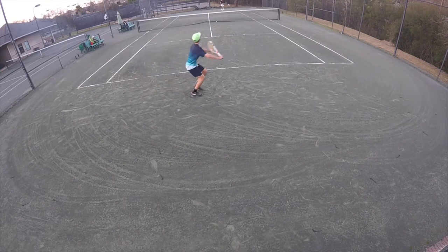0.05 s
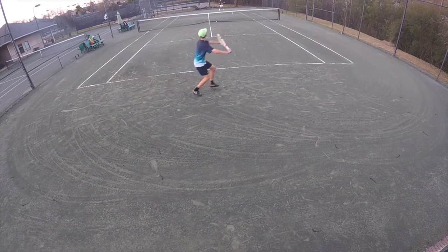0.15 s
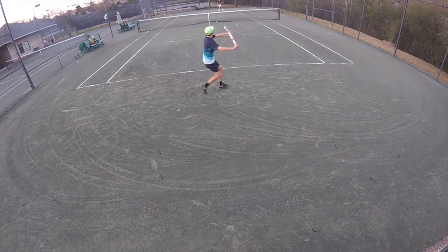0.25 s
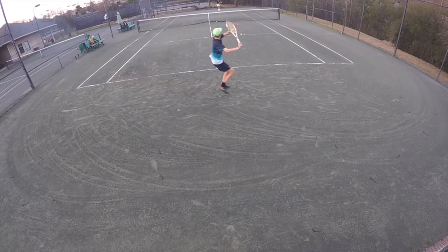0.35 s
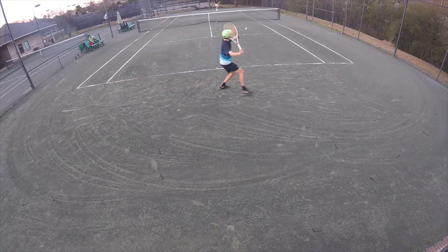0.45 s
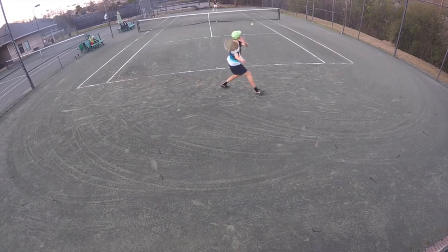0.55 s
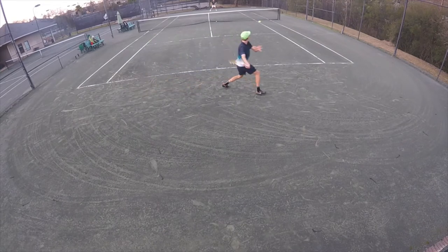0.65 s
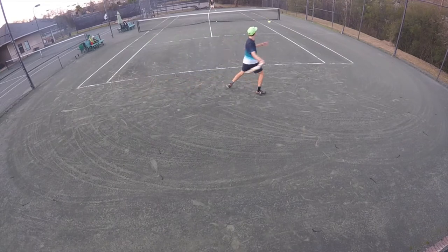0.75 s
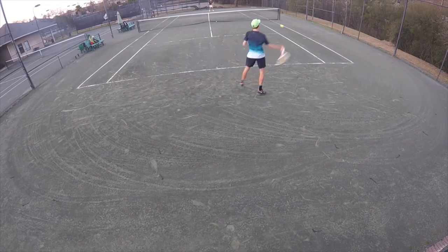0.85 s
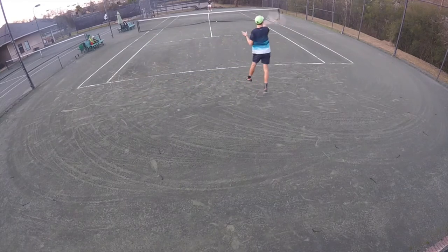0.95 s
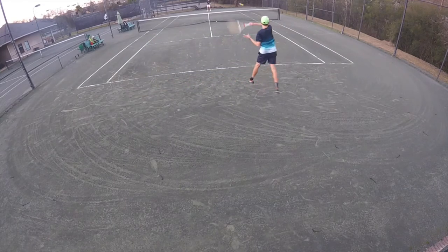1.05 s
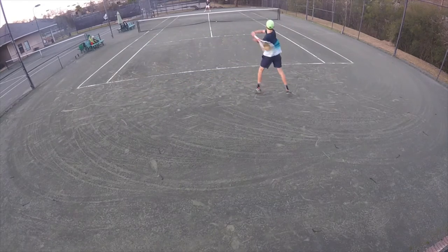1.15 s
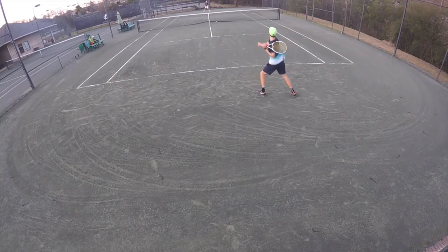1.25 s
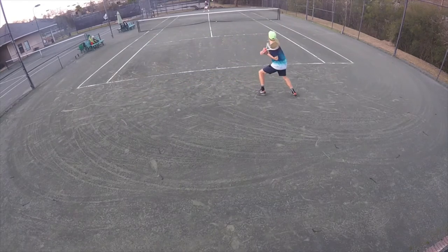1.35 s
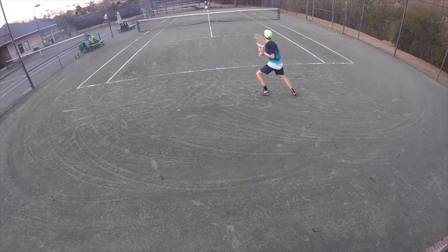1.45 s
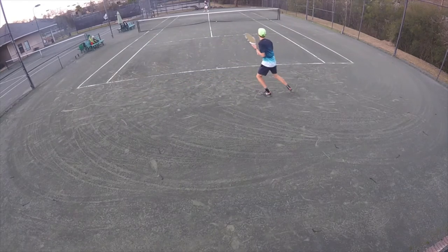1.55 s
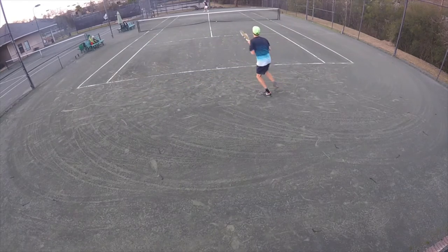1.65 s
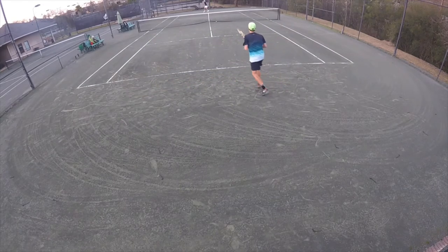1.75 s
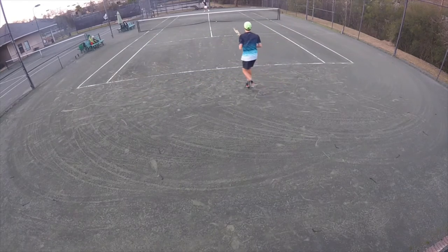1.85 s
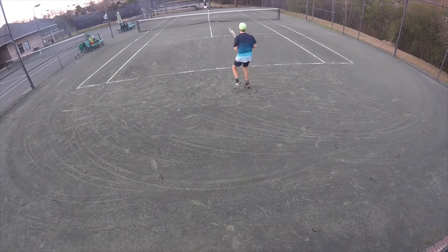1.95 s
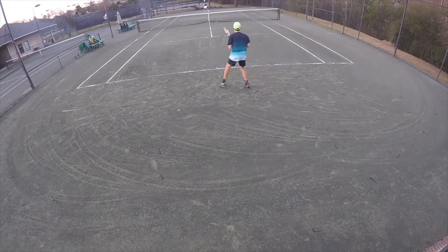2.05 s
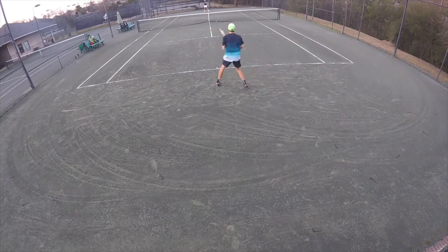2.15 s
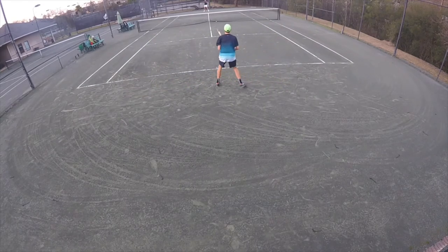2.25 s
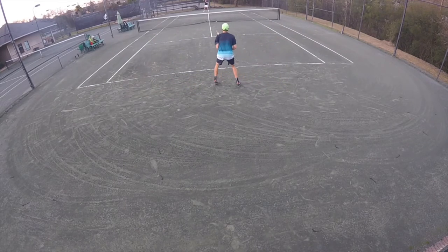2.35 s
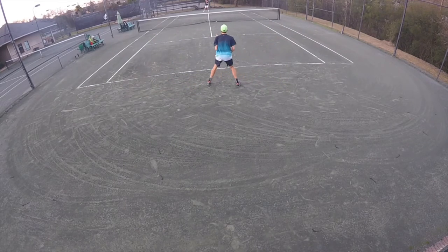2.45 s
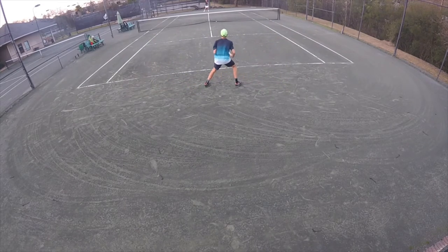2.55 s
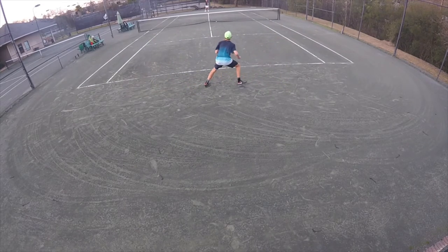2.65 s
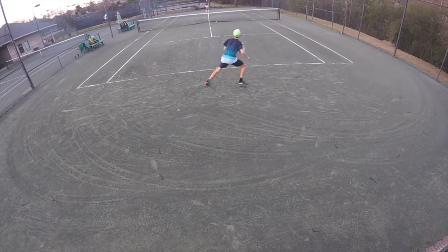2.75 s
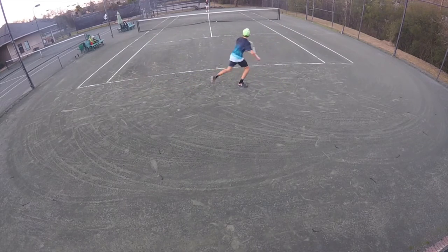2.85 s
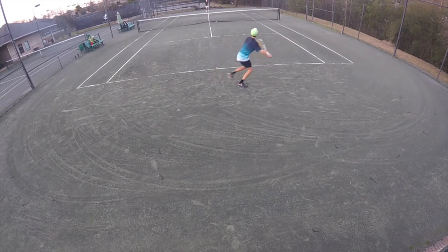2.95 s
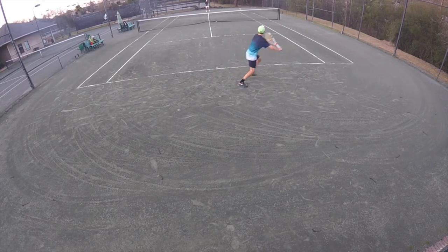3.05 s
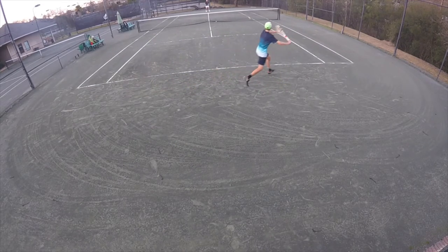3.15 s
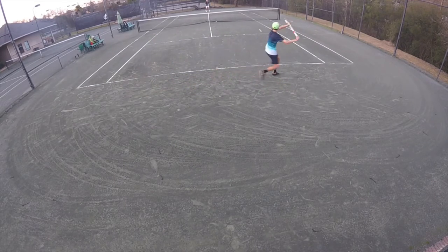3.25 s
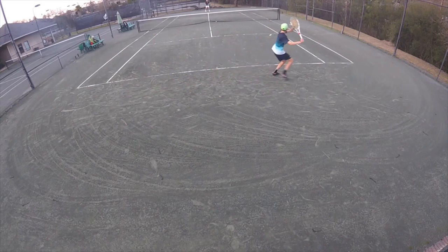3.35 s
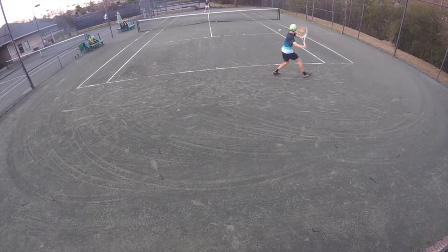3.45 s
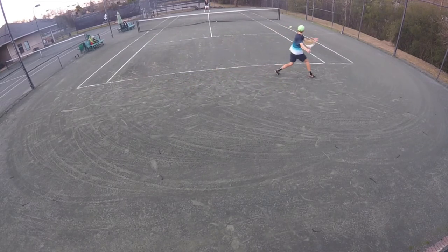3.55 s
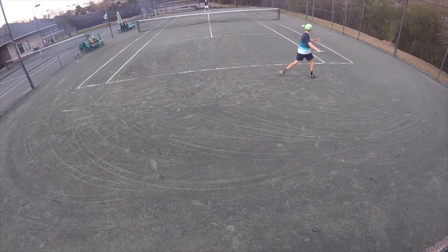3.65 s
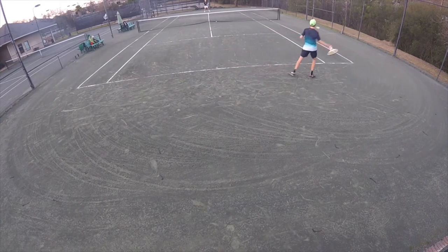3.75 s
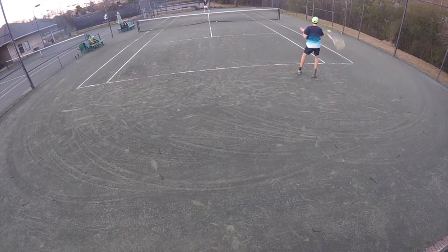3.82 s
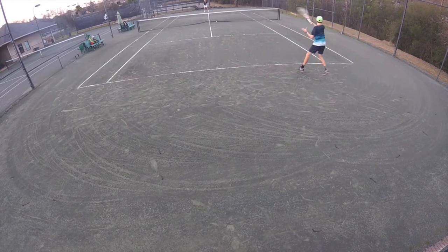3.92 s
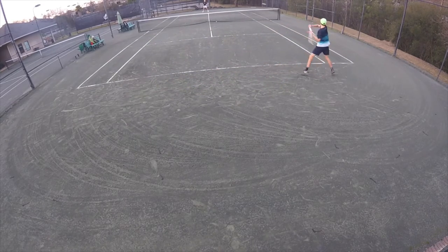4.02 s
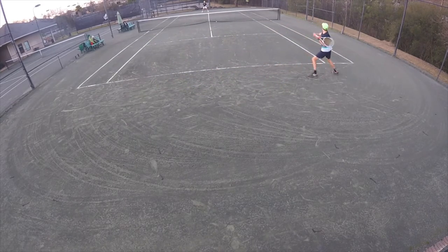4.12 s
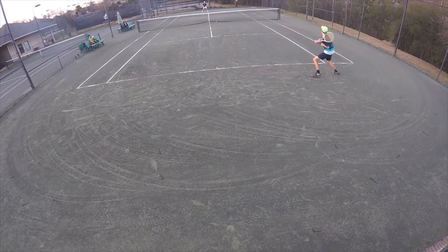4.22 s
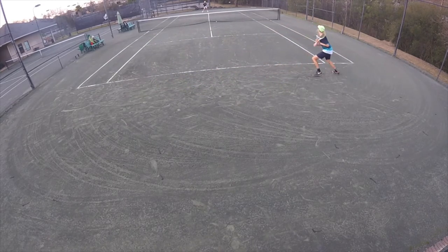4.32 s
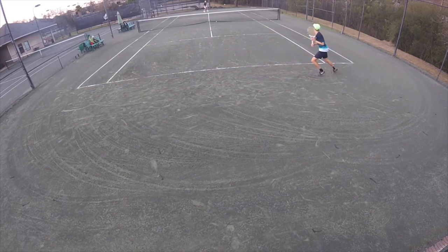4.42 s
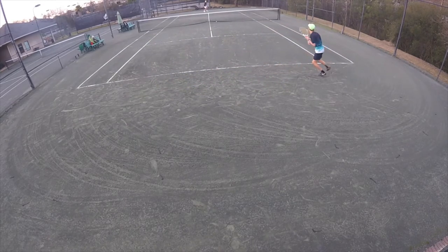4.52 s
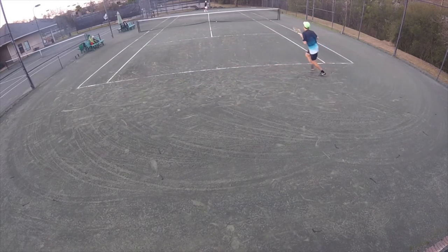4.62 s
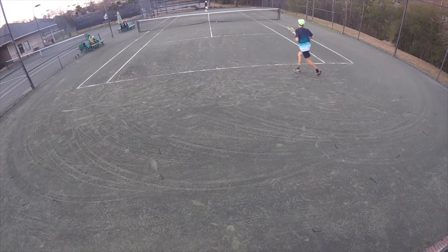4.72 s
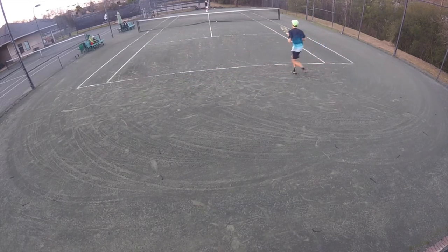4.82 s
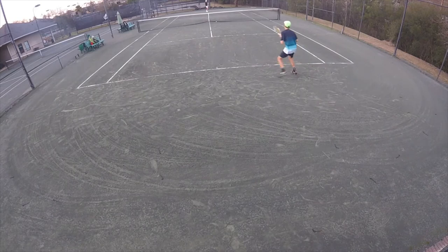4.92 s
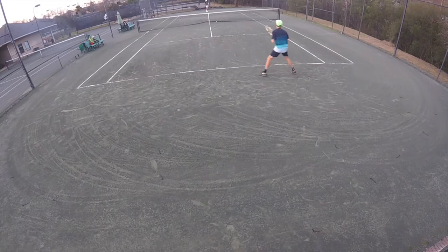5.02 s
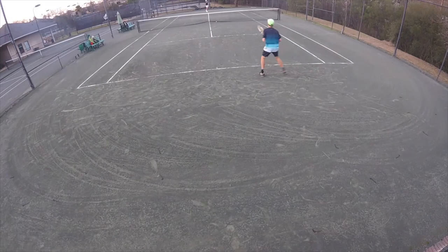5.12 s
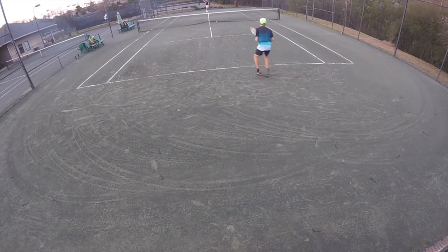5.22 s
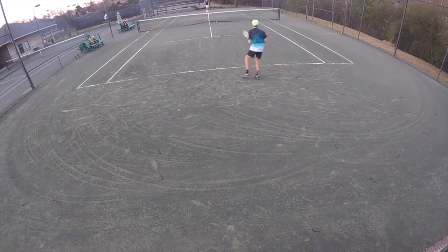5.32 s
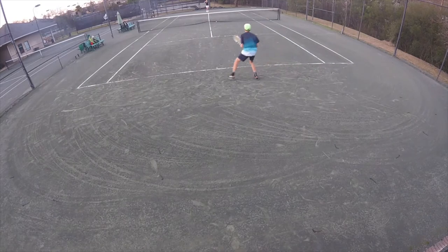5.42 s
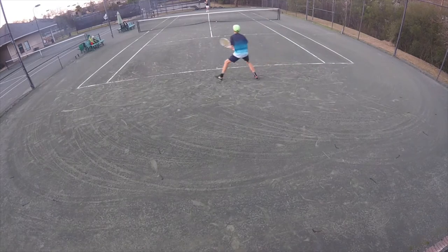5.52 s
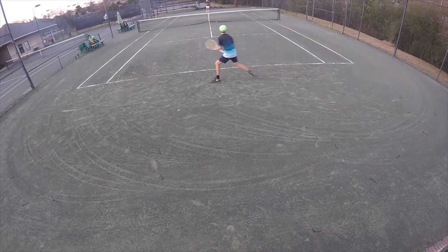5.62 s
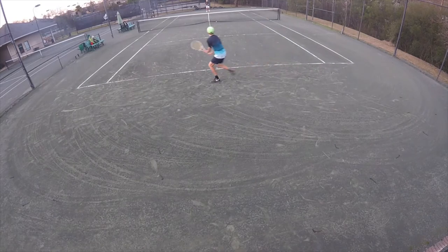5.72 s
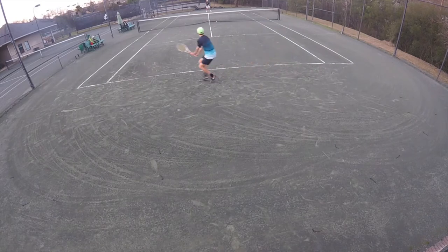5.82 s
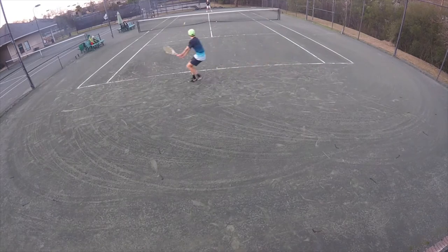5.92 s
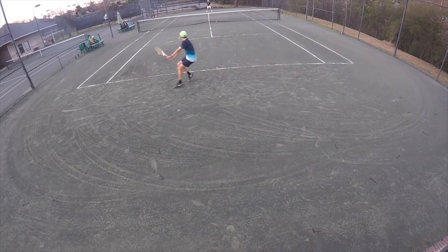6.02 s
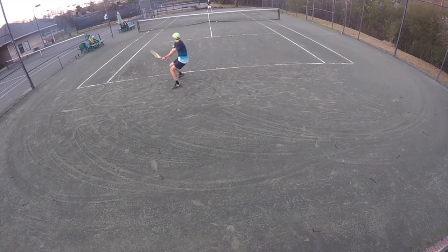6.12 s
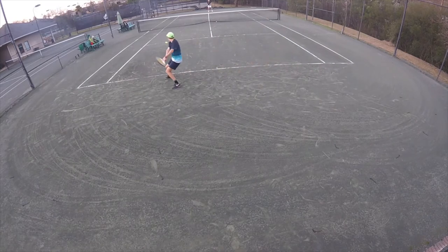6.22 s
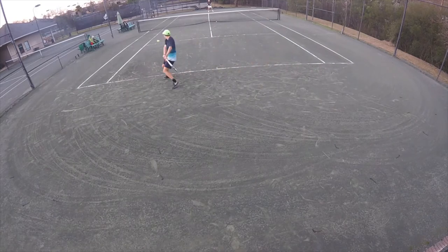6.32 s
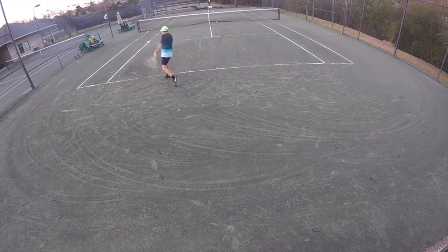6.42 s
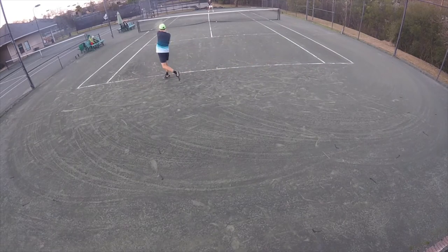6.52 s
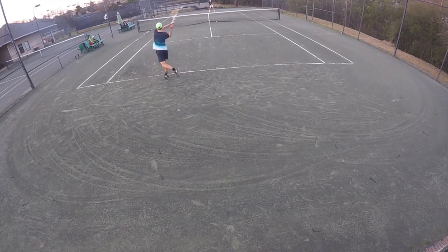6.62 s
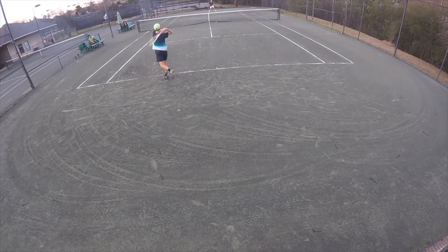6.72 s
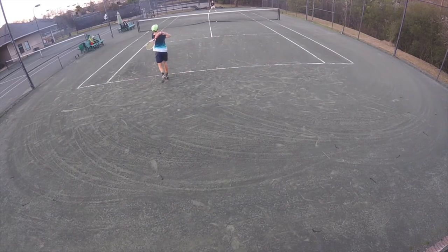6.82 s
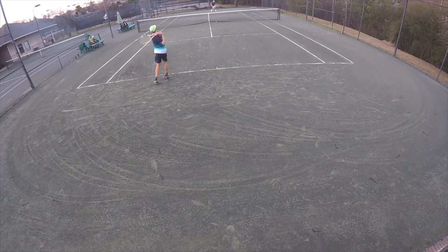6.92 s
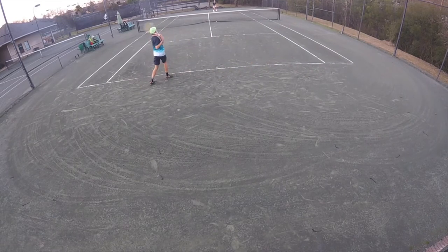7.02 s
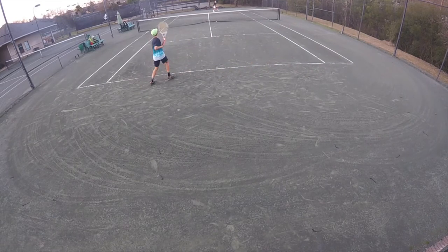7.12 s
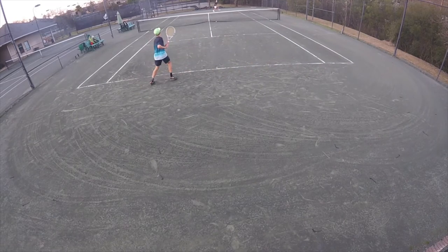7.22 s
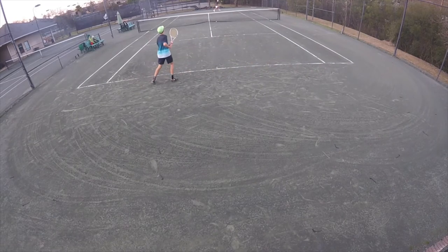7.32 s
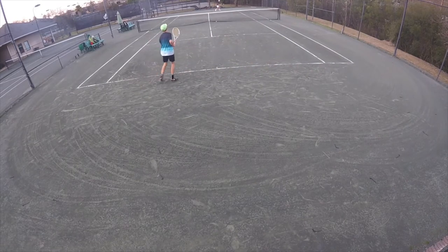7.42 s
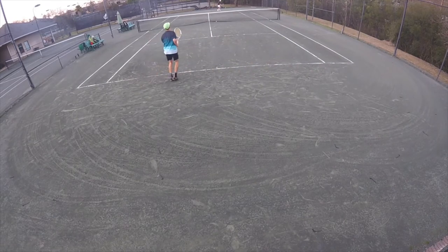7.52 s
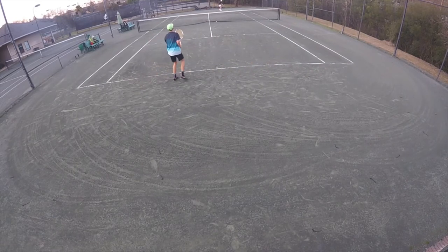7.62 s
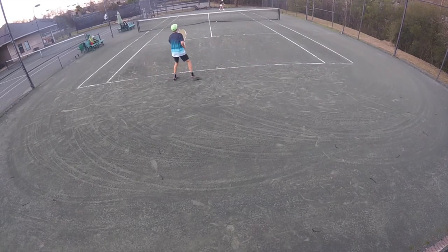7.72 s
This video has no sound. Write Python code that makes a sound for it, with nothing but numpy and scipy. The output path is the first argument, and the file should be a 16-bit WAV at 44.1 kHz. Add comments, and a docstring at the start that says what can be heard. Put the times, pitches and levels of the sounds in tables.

```python
"""Racket strokes of a tennis rally on an outdoor clay court, heard from behind the near player.
Each stroke is a thump, a short ring of strings and ball and a noisy crack, doubled by a ground echo
and answered by a thin tail from the surroundings. The ball thuds and rings as it bounces, shoes land
with a thud and slap, random grains make the crunch of sliding soles and one faint hiss, stones click.
Filtered noise makes the wind rumble and the distant traffic hum; a faint tone whistles once, far away."""
import sys
import numpy as np
from scipy import signal
from scipy.fft import rfft, irfft, next_fast_len
from scipy.io import wavfile
from scipy.ndimage import map_coordinates

SR = 44100
rng = np.random.default_rng(int(sys.argv[2]) if len(sys.argv) > 2 else 0)


def master(y):
    """Save y as 16-bit WAV."""
    cut = np.clip(np.atleast_2d(y).T, -1, 1)
    pcm = np.round(cut * 32767)  # scale
    wavfile.write(sys.argv[1], SR, pcm.astype(np.int16))


N = 342657
T = np.arange(N) / SR  # time in seconds
BLOW = T[:SR // 8] - 0.005  # time within one blow, from just before the contact at 0

# Tone colour of felt slapping strings. Each row: frequency in Hz, relative level in dB per Hz.
CRACK_COLOUR = [(600, 9.5), (1450, 11), (2000, -2.5), (2700, 2), (3800, 1.5), (4400, -9.5), (5200, -6.5),
                (7500, -10), (10000, -11.5), (12000, -15.5), (15000, -14)]
# Dull colour of a shoe or ball slapping the clay. Each row: frequency in Hz, relative level in dB per Hz.
SLAP_COLOUR = [(100, -40), (350, 7.5), (1200, 8), (1800, -34), (4000, -27), (12000, -51)]
# Bright colour of grit and small stones. Each row: frequency in Hz, relative level in dB per Hz.
GRIT_COLOUR = [(1200, -32), (2000, -4), (2450, -2.5), (3100, -3), (3900, -8.5), (4350, -5.5), (5000, -7),
               (7000, -9), (8500, -12.5), (10500, -14), (12800, -17.5), (14500, -33)]


def amp(db):
    """Turn decibels into a gain."""
    return 10 ** (np.asarray(db) / 20)


def unit(x):
    """Scale to an rms (average strength) of 1."""
    return x / np.sqrt(np.mean(x ** 2) + 1e-20)


def along(points, hz):
    """Read a curve of (Hz, value) points, with frequency on a log axis."""
    f, v = np.transpose(points)
    return np.interp(np.log(hz + 1), np.log(f + 1), v)


def filtered(x, response):
    """Multiply each frequency of x by the gain that response gives for it."""
    size = next_fast_len(len(x) + 8192)
    spectrum = rfft(x, size) * response(np.fft.rfftfreq(size, 1 / SR))
    return irfft(spectrum, size)[:len(x)]


def coloured(x, colour):
    """Give x a tone colour, at rms 1."""
    return unit(filtered(x, lambda hz: amp(along(colour, hz))))


def noise(colour, size):
    """Make fresh coloured noise of rms 1."""
    return coloured(rng.standard_normal(size), colour)


def wobble(rate):
    """Draw a smooth random curve through `rate` random points a second."""
    points = rng.standard_normal(int(N * rate / SR) + 4)
    return map_coordinates(points, [T * rate])


def add(track, s, sound):
    """Mix a blow into the track, its contact at time s."""
    part = track[round((s + BLOW[0]) * SR):][:len(sound)]
    part += sound[:len(part)]


def push(hz, centre):
    """Pressure of one brief contact: a small rise, a deep dip, a small rise."""
    u = np.pi * hz * (BLOW - centre)
    return (2 * u * u - 1) * np.exp(-u * u)


def ring(hz, t60, start, attack):
    """One fading tone that builds up during the contact; t60 is the time to fall by 60 dB."""
    t = np.maximum(BLOW - start, 0)
    swell = amp(-60 * t / t60) * (1 - np.exp(-t / attack)) ** 2
    return np.sin(2 * np.pi * hz * t) * swell / swell.max()


def burst(colour, t60, attack):
    """A dying puff of coloured noise."""
    t = np.maximum(BLOW, 0)
    swell = amp(-60 * t / t60) * (1 - np.exp(-t / attack))
    return noise(colour, size=len(BLOW)) * swell


def wind():
    """Slow eddies rumble on the microphone; smaller ones buffet it higher up."""
    # Colours of the rumble and the buffeting. Each row: frequency in Hz, relative level in dB per Hz.
    rumble_colour = [(8, -10.5), (22, 2), (45, 0), (65, -9), (90, -18.5), (150, -58), (400, -92)]
    buffet_colour = [(35, -8), (70, 3), (100, -2.5), (130, -6.5), (180, -12.5), (280, -21), (500, -29.5),
                     (1500, -95)]
    # Level of the low rumble and buffeting; some rises coincide with racket thumps.
    # Each row: time in seconds, level in dB before the trim below.
    rumble_level = [(0.0, -47), (0.08, -24.5), (0.13, -32.5), (0.89, -31), (0.97, -23), (1.06, -35),
                    (1.17, -27.5), (1.43, -36), (1.51, -27), (3.01, -31.5), (3.14, -22.5), (3.2, -39),
                    (3.24, -25), (3.51, -34), (3.7, -34.5), (3.74, -18.5), (3.79, -28), (4.35, -34),
                    (4.37, -25.5), (4.63, -35.5), (4.8, -23), (5.02, -33.5), (5.24, -22.5), (5.39, -30),
                    (5.43, -23), (5.65, -32), (5.71, -22), (6.19, -30), (6.25, -24.5), (6.71, -35.5),
                    (7.12, -28.5), (7.31, -20.5), (7.36, -28), (7.77, -29)]
    buffet_level = [(0.0, -38.5), (0.24, -36), (0.34, -43), (0.39, -36), (0.86, -36.5), (0.97, -26.5),
                    (1.06, -34), (1.13, -29.5), (2.44, -38), (2.46, -29.5), (2.64, -42.5), (2.81, -37),
                    (2.86, -42.5), (3.01, -34.5), (3.4, -31), (3.44, -44.5), (3.92, -31), (4.11, -40.5),
                    (4.37, -33.5), (4.61, -43), (4.74, -32.5), (5.04, -39.5), (5.13, -34), (5.82, -38.5),
                    (5.84, -32), (6.17, -40.5), (6.25, -28.5), (6.49, -36), (6.51, -31), (6.56, -41),
                    (7.06, -41), (7.29, -30), (7.4, -38), (7.42, -37.5), (7.62, -32.5), (7.77, -38.5)]
    rumble_trim_db, buffet_trim_db = 0.13, 1.94
    eddy_db, eddies_per_s = 1.6, 16  # quick random swings of the buffeting

    rumble_db = rumble_trim_db + np.interp(T, *np.transpose(rumble_level))
    rumble = amp(rumble_db) * noise(rumble_colour, size=N)
    buffet_db = buffet_trim_db + np.interp(T, *np.transpose(buffet_level))
    buffet_db += eddy_db * wobble(eddies_per_s)
    buffet = amp(buffet_db) * noise(buffet_colour, size=N)
    return rumble + buffet


def traffic():
    """A far road hums almost evenly: low noise with small drifts in level."""
    # Colour of distant traffic and air. Each row: frequency in Hz, relative level in dB per Hz.
    traffic_colour = [(60, 4.5), (200, 0.5), (400, -1), (650, -1), (880, 2.5), (1200, -2), (1450, -12),
                      (1900, -21.5), (3600, -25), (4500, -29), (7000, -33), (10000, -38), (12500, -45.5),
                      (14500, -96)]
    drift_db = 0.4 * wobble(2) + 0.4 * wobble(12)
    return amp(-45.0 + drift_db) * noise(traffic_colour, size=N)


def bounces():
    """The hollow ball thuds on the court and rings briefly, kicking up a little grit."""
    # The ball hitting the clay. Each row: time in seconds, level in dB, pitch of the hollow ball in Hz,
    # time in seconds for its ring to fall by 60 dB.
    bounce_table = [(0.3803, -25.5, 1150, 0.0082), (3.357, -30, 1200, 0.012), (6.1330, -25.5, 1180, 0.011)]
    thud_db = 1  # against the ball's ring
    track = np.zeros(N)
    for s, db, ball_hz, t60 in bounce_table:
        shell = ring(ball_hz, t60, start=0.0001, attack=0.0014)
        lower_ring = amp(-7.0) * ring(920, t60=0.017, start=0.00093, attack=0.00069)
        grit = amp(-11.5) * burst(SLAP_COLOUR, t60=0.028, attack=0.0003)
        thud = amp(thud_db) * push(217, centre=0.0026)
        add(track, s, amp(db) * (shell + lower_ring + grit + thud))
    return track


def surrounds(x):
    """Fence, trees and buildings scatter a thin tail that swells at once; each frequency dies at its own speed."""
    # How long the tail lasts. Each row: frequency in Hz, time in seconds to fall by 60 dB.
    tail_t60 = [(150, 1), (1000, 0.45), (3500, 0.41), (12000, 0.43)]
    # Each row: frequency in Hz, relative level in dB.
    tail_colour = [(150, 4.5), (500, -8.5), (1000, 3.5), (2000, 9.0), (3500, 5.0), (7000, 4.0), (12000, -6)]
    # split noise into short frequency slices and let each one fade
    hz, t, slices = signal.stft(rng.standard_normal(SR), SR, nperseg=256)
    fade = amp(-60 * t / along(tail_t60, hz)[:, None])
    tail = signal.istft(slices * fade, SR, nperseg=256)[1]
    tail = filtered(tail, lambda f: amp(along(tail_colour, f)))
    tail *= 1 - np.exp(-(np.arange(len(tail)) / SR / 0.0013) ** 2)  # soft start
    return signal.fftconvolve(x, tail / np.linalg.norm(tail))[:N]


def crack(frame_db):
    """Felt and strings slap together, then the frame rattles and rings on briefly."""
    # Ringing of the racket frame and high strings. Each row: pitch in Hz, level in dB before frame_db,
    # time in seconds to fall by 60 dB. Each pitch is shifted a little at random below.
    frame_modes = [(2363, -19.5, 0.064), (3265, -22.5, 0.076)]
    rattle_db, dull_above_hz = -25, 14000
    slap = burst(CRACK_COLOUR, t60=0.027, attack=0.00033)
    rattle = amp(rattle_db) * burst(CRACK_COLOUR, t60=0.097, attack=0.002)
    frame = np.zeros(len(BLOW))
    for hz, db, t60 in frame_modes:
        shifted_hz = hz * (1 + 0.024 * rng.standard_normal())
        frame += amp(db) * ring(shifted_hz, t60, start=0, attack=0.0012)
    dulled = filtered(slap + rattle, lambda hz: 1 / (1 + (hz / dull_above_hz) ** 6))
    return dulled + amp(frame_db) * frame


def strokes():
    """The ball sinks into the strings and both ring on; the ground and the surroundings answer each blow."""
    # Racket strokes, near and far player in turn. Each row: time in seconds, thump in dB, thump in Hz,
    # ground echo lag in ms, wait before the strings ring in ms, strings in Hz, strings in dB,
    # strings' time to fall by 60 dB in seconds, ball in Hz, ball in dB, wait before the ball rings in ms,
    # overtone in Hz, overtone in dB, crack in dB, tail in dB, frame ring in dB against the crack,
    # ping of strings snapping over each other in Hz, ping in dB.
    stroke_table = [(0.9573, -1, 424, 3.51, 0.6, 750, -9.5, 0.016, 1123, -8.5, 1.68, 3050, -35, -20, -17, -8, 14000, -42),
                    (2.337, -25.5, 298, 3.15, 1.14, 840, -35, 0.017, 1100, -31, 1.22, 3430, -43, -43.5, -8.5, -4, 6000, -58),
                    (3.8914, -7, 390, 2.47, 0.68, 766, -16, 0.018, 1010, -12.5, 2.16, 2350, -30, -23.5, -16.5, -2, 11000, -52),
                    (5.164, -18, 240, 2.06, 0.95, 700, -25.5, 0.011, 1130, -28, 1.2, 2930, -51, -38.5, -10, 1, 6500, -58),
                    (6.5123, -7, 380, 2.52, 3.1, 900, -10.5, 0.016, 1130, -19.5, 2.01, 1565, -26.5, -26, -18.5, -9, 9800, -38)]
    # the clay mirrors sound below this pitch and scatters the crack
    ground_gain, ground_hz, scatter_db = 0.69, 1900, -1
    wash_db = -15  # share of the crack that reaches the surroundings

    def ground(hz):
        return ground_gain / np.sqrt(1 + (hz / ground_hz) ** 6)

    track = np.zeros(N)
    # heard from all sides at once, the crack evens out into a plain click
    click = coloured(signal.unit_impulse(len(BLOW), np.argmax(BLOW > 0)), CRACK_COLOUR)
    for (s, thump_db, thump_hz, lag_ms, dwell_ms, strings_hz, strings_db, strings_t60,
         ball_hz, ball_db, release_ms, overtone_hz, overtone_db, crack_db, tail_db,
         frame_db, ping_hz, ping_db) in stroke_table:
        thump = amp(thump_db) * push(thump_hz, centre=0.002)
        strings = amp(strings_db) * ring(strings_hz, strings_t60, start=dwell_ms / 1000, attack=0.0015)
        ball = amp(ball_db) * ring(ball_hz, t60=0.0093, start=release_ms / 1000, attack=0.0019)
        overtone = amp(overtone_db) * ring(overtone_hz, t60=0.014, start=0.00012, attack=0.0014)
        ping = amp(ping_db) * ring(ping_hz, t60=0.012, start=0, attack=0.0004)
        body = thump + strings + ball
        direct = body + overtone + ping + amp(crack_db) * crack(frame_db)
        echo = filtered(body, ground) + amp(crack_db + scatter_db) * crack(frame_db)
        tail = amp(tail_db) * surrounds(body + amp(crack_db + wash_db) * click)
        add(track, s, direct)
        add(track, s + lag_ms / 1000, echo)
        add(track, s, tail)
    return track


def steps():
    """A landing shoe gives a soft thud and a dull slap."""
    # Shoes landing. Each row: time in seconds, thud in dB, slap in dB.
    step_table = [(1.149, -34, -28), (1.1717, -17.5, -25.5), (2.437, -32, -37), (2.624, -29.5, -47),
                  (2.8174, -49, -33.5), (4.0545, -29.5, -30.5), (4.802, -32, -40), (5.268, -26, -30),
                  (7.285, -29, -55)]
    thud_hz = 255
    track = np.zeros(N)
    for s, thud_db, slap_db in step_table:
        thud = amp(thud_db) * push(thud_hz, centre=0.0017)
        slap = amp(slap_db) * burst(SLAP_COLOUR, t60=0.038, attack=0.0013)
        add(track, s, thud + slap)
    return track


def grains(length_s):
    """Grains of clay snap at random, each ringing an instant at its own pitch; rms 1."""
    grains_per_s, decay_s, spread_db = 20000, 0.00046, 3  # spread: how unequal the grains are
    count = int(grains_per_s * length_s) + 1
    gap, pitch, size, phase = rng.random((count, 4)).T[:, :, None]
    # random waits between snaps, added up into start samples
    onset = np.cumsum(-np.log(1 - gap), axis=0) * SR / grains_per_s
    t = T[:SR // 300]
    strength = amp(-spread_db * np.log(np.maximum(size, 0.02)))
    tone = np.sin(np.pi * SR * pitch * t + 2 * np.pi * phase)  # any pitch up to SR / 2
    snaps = strength * t * np.exp(-t / decay_s) * tone
    places = onset.astype(int) + np.arange(len(t))
    return unit(np.bincount(places.ravel(), snaps.ravel()))


def slides():
    """Grains crunch and rasp under a sliding sole; each slide has its own amount of deeper scrape."""
    # Soles sliding on grit, and one faint high hiss before the last stroke. Each row: start in seconds,
    # time to bite in seconds, length in seconds, grit in dB, rasp in dB, deeper scrape in dB,
    # rasp pitch ratio, scrape pitch ratio.
    slide_table = [(1.175, .004, 0.19, -58.5, -57.5, -40, 1, 0.92),
                   (1.207, 0.035, 0.064, -50, -47.5, -45.5, 0.99, .85),
                   (1.465, 0.035, .085, -65.5, -65, -50, 1, 0.95),
                   (1.86, 0.015, 0.045, -60, -63, -68, 1, 1),
                   (2.118, 0.031, 0.084, -60, -54.5, -54, 1.02, 1.15),
                   (2.424, 0.015, 0.06, -63, -63, -59, 1.05, 1.1),
                   (2.472, 0.016, 0.25, -64.5, -64.5, -53, 1, 0.97),
                   (2.635, 0.02, .05, -67, -70, -62, 1.1, 1), (2.787, 0.028, 0.07, -65, -64, -68, 1.02, 1),
                   (3.23, 0.014, 0.1, -68, -68, -52, 1, 0.78), (3.73, 0.0065, 0.23, -60, -76, -63, 1, 0.84),
                   (4.063, 0.031, 0.2, -54, -56, -45, 0.94, 1), (4.393, .05, 0.12, -65, -68, -65, 1, 1),
                   (4.772, 0.02, 0.069, -61, -58, -58, 0.94, 1),
                   (5.006, 0.024, 0.097, -49, -47, -41.5, .97, 1.12),
                   (5.293, 0.012, 0.13, -60.5, -56.5, -51, 0.95, 0.83),
                   (5.854, 0.017, 0.068, -52.5, -46.5, -42.5, 1.004, 1.14),
                   (5.885, 0.044, 0.049, -54, -54, -36.5, 0.96, 1.02),
                   (6.005, 0.0061, 0.11, -53.5, -50, -41.5, 1.01, 1.12),
                   (6.21, 0.0054, 0.047, -59, -52, -45, 1.01, 0.96),
                   (6.248, .02, 0.11, -61.5, -69, -45, 1.03, 0.8),
                   (6.382, 0.053, 0.31, -63.5, -71, -70, 1.1, 1),
                   (6.935, 0.023, 0.11, -59.5, -59, -51, 1.03, 1.1),
                   (7.052, 0.049, .12, -75, -68, -67, .82, 1), (7.273, .02, 0.071, -72, -71, -61, 1, 1),
                   (7.55, 0.026, 0.18, -69, -67, -52, 1, 1.03)]
    # Colours of the rasp and the scrape. Each row: frequency in Hz (before the pitch ratio),
    # relative level in dB per Hz.
    rasp_colour = [(2600, -30), (3000, -6), (3250, 1.5), (3650, 4), (3950, -5), (4200, -29), (4500, -42)]
    scrape_colour = [(150, -28), (400, 5), (1100, 14.5), (1700, 2), (2500, -28), (3500, -8.5), (8000, -46)]
    ease_power = 1.93  # how steeply a slide dies away
    judder_db, judder_per_s = 2, 60  # depth and speed of the stick and slip
    track = np.zeros(N)
    for start, bite_s, length_s, grit_db, rasp_db, scrape_db, rasp_pitch, scrape_pitch in slide_table:
        layers = [(grit_db, GRIT_COLOUR, 1), (rasp_db, rasp_colour, rasp_pitch),
                  (scrape_db, scrape_colour, scrape_pitch)]

        def mixed_colour(hz):
            power = 0
            for db, colour, pitch in layers:
                power = power + (amp(db) * unit(amp(along(colour, hz / pitch)))) ** 2
            return np.sqrt(power)

        crunch = filtered(grains(length_s), mixed_colour)
        t = T[:len(crunch)]
        # the sound rises as the sole bites and eases off as it slows down
        bite = np.clip(t / bite_s, 0, 1)
        ease = np.clip((length_s - t) / max(length_s - bite_s, 0.002), 0, 1)
        add(track, start - BLOW[0], np.sqrt(bite * ease ** ease_power) * crunch)
    return amp(judder_db * wobble(judder_per_s)) * track


def ticks():
    """A loose stone snaps from under the sole and rings for an instant."""
    # Stones clicking under a shoe. Each row: time in seconds, tick in dB, ring in dB.
    tick_table = [(1.864, -60, -64), (2.813, -52, -55), (6.812, -55, -53), (7.282, -57, -63)]
    stone_hz = 3350
    track = np.zeros(N)
    for s, tick_db, ring_db in tick_table:
        tick = amp(tick_db) * burst(GRIT_COLOUR, t60=0.025, attack=0.0004)
        stone = amp(ring_db) * ring(stone_hz, t60=0.021, start=0, attack=0.00032)
        add(track, s, tick + stone)
    return track


def whistle():
    """A thin, wavering tone far away, perhaps a bird, glides up, quickly at first, and fades."""
    at_s, length_s, attack_s = 3.12, 0.26, 0.026
    from_hz, to_hz, glide_s = 1270, 1495, 0.055
    level_db, fade_db_per_s = -55, 18
    t = np.clip(T - at_s, 0, length_s)
    pitch_hz = to_hz + (from_hz - to_hz) * np.exp(-t / glide_s)
    wavering_hz = pitch_hz * (1 + 0.0078 * wobble(130))
    phase = 2 * np.pi * np.cumsum(wavering_hz) / SR
    swell = np.minimum(np.minimum(t, length_s - t) / attack_s, 1)
    return amp(level_db - fade_db_per_s * t) * swell * np.sin(phase)


def scene():
    """The rally in its surroundings, over wind and traffic."""
    court = bounces() + steps() + slides() + ticks()
    court_tail = amp(-16) * surrounds(court)
    return (wind() + traffic() + court + court_tail + strokes() + whistle())[None]


def record(dry):
    """Round off the loudest peaks smoothly, then cut away the treble above a band limit."""
    ceiling, hardness, top_hz = 0.97, 8, 15700  # ceiling: 1 is full scale
    rounded = dry / (1 + np.abs(dry / ceiling) ** hardness) ** (1 / hardness)
    band_limit = signal.ellip(12, 0.1, 100, top_hz, fs=SR, output="sos")
    return signal.sosfilt(band_limit, rounded)


dry = scene()
out = record(dry)
master(out)
```